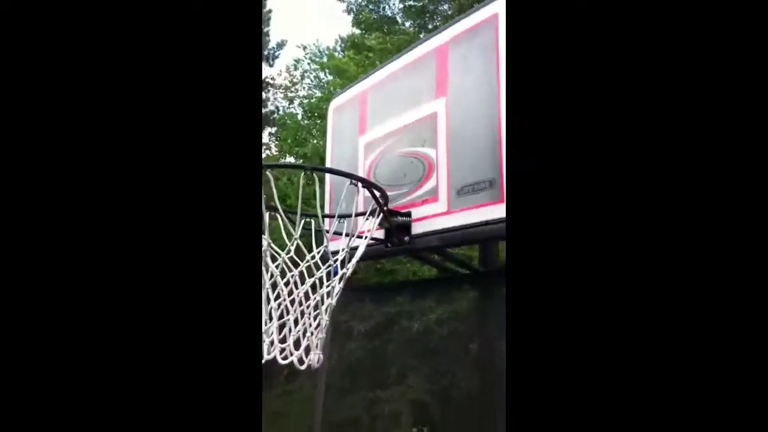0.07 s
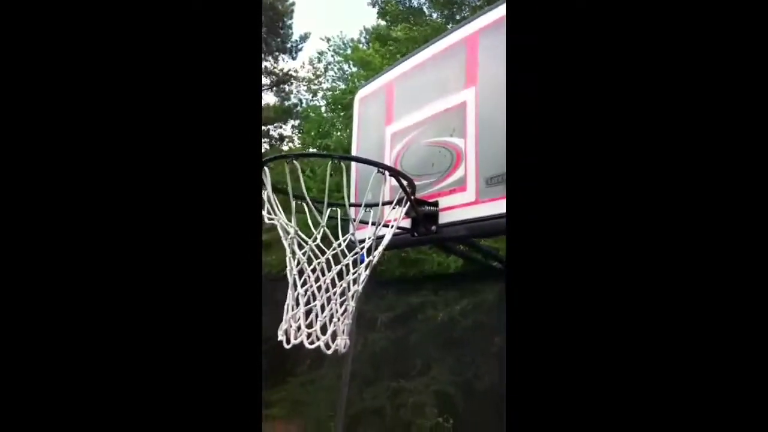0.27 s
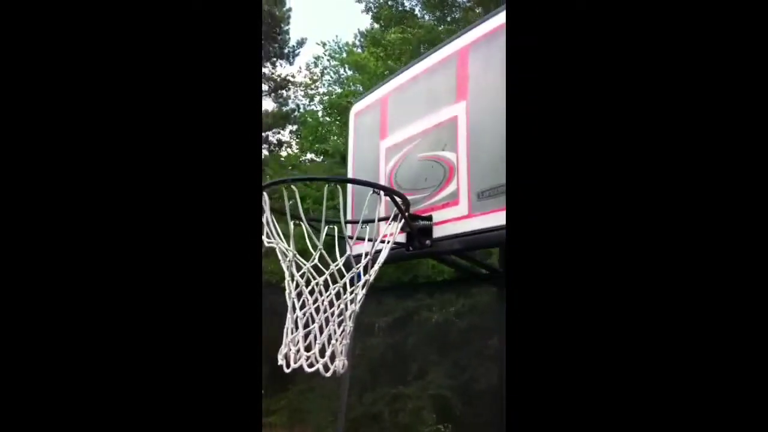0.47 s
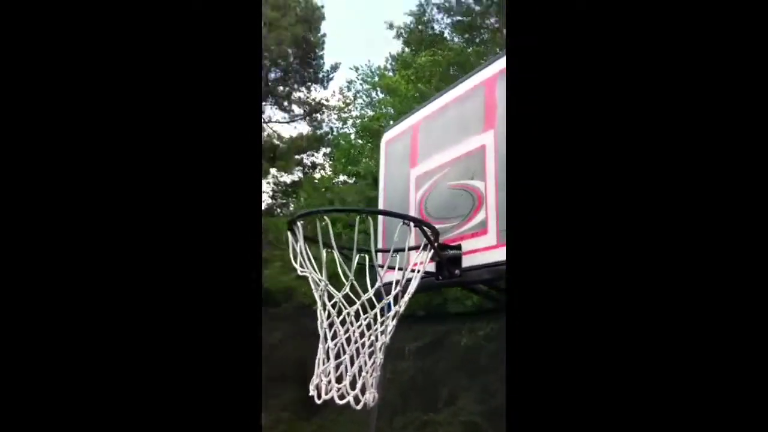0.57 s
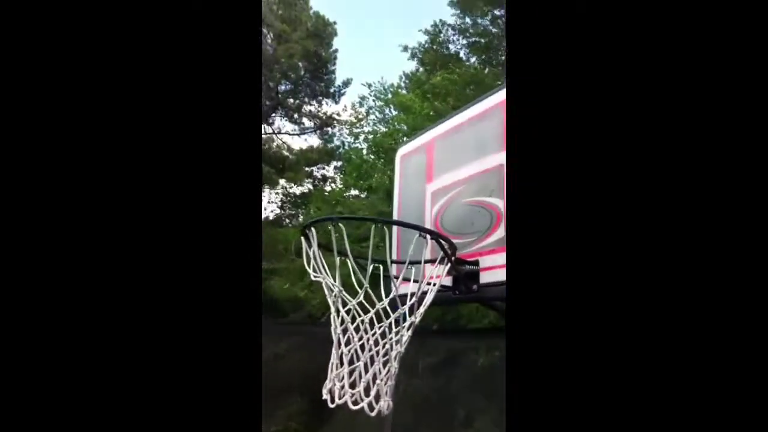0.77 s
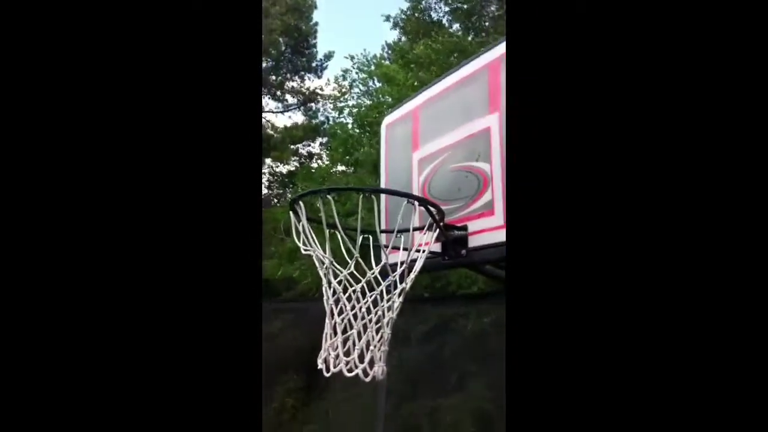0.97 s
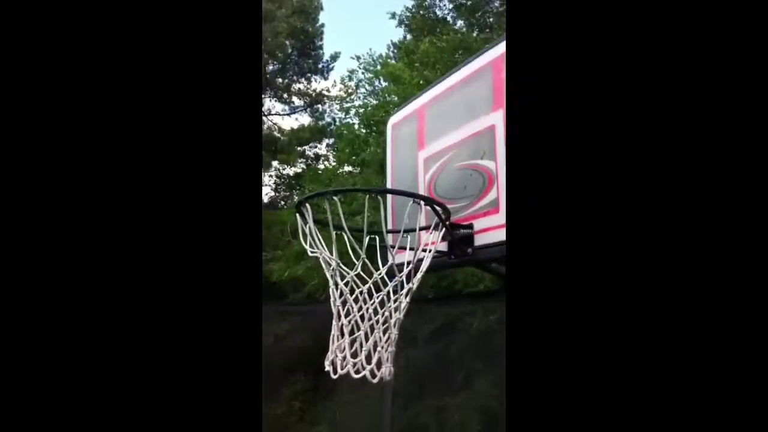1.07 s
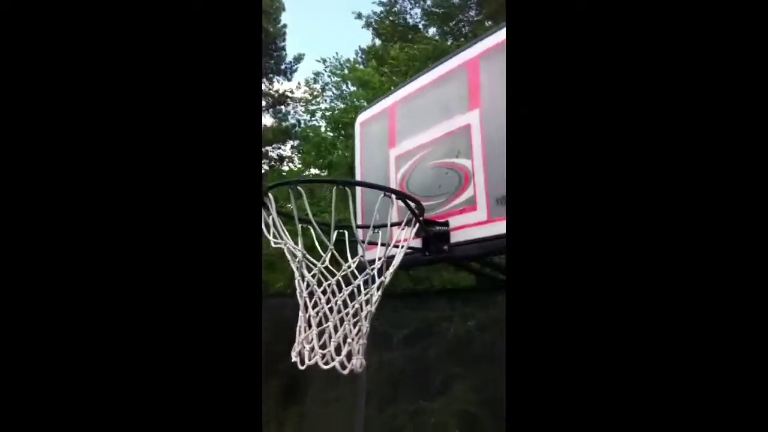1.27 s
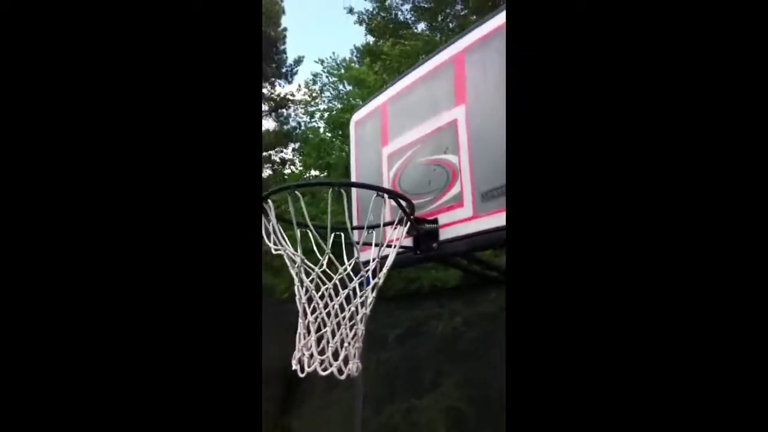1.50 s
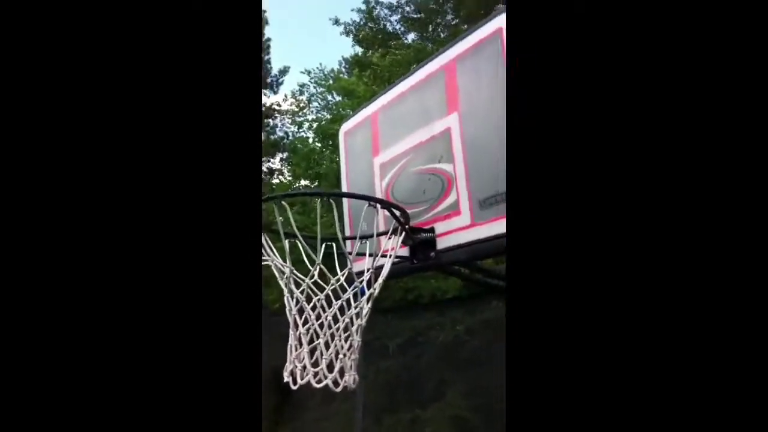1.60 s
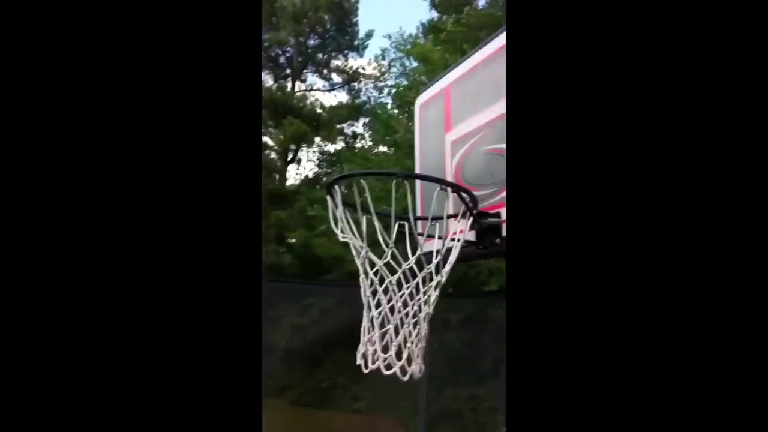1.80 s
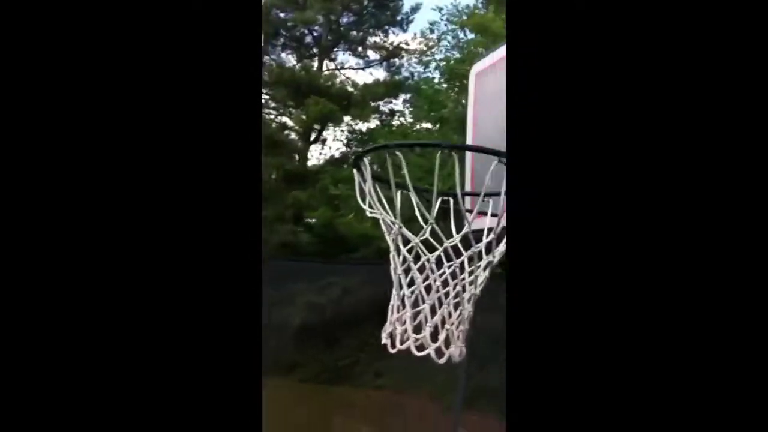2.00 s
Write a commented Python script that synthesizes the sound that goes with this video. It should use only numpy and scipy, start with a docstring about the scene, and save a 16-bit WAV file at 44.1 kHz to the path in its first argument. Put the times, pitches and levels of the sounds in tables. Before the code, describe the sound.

Rough swishing drags of feet sliding on a woven trampoline mat, close by in a quiet garden

```python
"""Feet land and slide on the woven mat of a garden trampoline, close by, outdoors.
Throughout, filtered noise makes far traffic and leaves, a wavering sine an insect's thin whine.
From the start, steel hook modes clink now and then; filtered thread slips make rushing drags.
Soon springs creak as wandering sines and landings thud as damped mat modes; late, dry knocks hit the frame pad."""
import sys
import numpy as np
from scipy import signal
from scipy.fft import rfft, irfft, next_fast_len
from scipy.io import wavfile

SR = 44100
rng = np.random.default_rng(int(sys.argv[2]) if len(sys.argv) > 2 else 0)


def wrap_up_sound(samples):
    """Save the sound to the file named by the first command line argument, as 16-bit audio."""
    columns = np.atleast_2d(samples).T
    # keep every value between -1 and 1, then stretch to whole-number steps
    tamed = np.clip(columns, -1, 1)
    steps = np.round(tamed * 32767).astype(np.int16)
    wavfile.write(sys.argv[1], SR, steps)


def boost_factor(decibels):
    """Convert a level in decibels to a linear amplitude factor."""
    exponent = np.asarray(decibels, float) / 20
    return 10 ** exponent


N = 90404


def rms_one(x):
    """Scale to rms 1."""
    return x / np.sqrt(np.mean(x ** 2) + 1e-20)


def butter(x, order, cut_hz, kind="low"):
    """Causal Butterworth filter."""
    return signal.sosfilt(signal.butter(order, cut_hz, kind, fs=SR, output="sos"), x)


def butter_zero_phase(x, order, cut_hz, kind="low"):
    """Butterworth filter run forwards and backwards, so its band can be subtracted."""
    return signal.sosfiltfilt(signal.butter(order, cut_hz, kind, fs=SR, output="sos"), x)


def colour(x, points):
    """Causal (minimum-phase) filter with the given dB over log frequency, via the folded cepstrum."""
    size = next_fast_len(len(x) + 4096) * 2
    hz, db = np.transpose(points)
    log_hz = np.log(np.fft.rfftfreq(size, 1 / SR) + 1)
    log_gain = np.interp(log_hz, np.log(hz), db) * np.log(10) / 20
    cepstrum = irfft(log_gain, size)
    cepstrum[1:size // 2] *= 2
    cepstrum[size // 2 + 1:] = 0
    return irfft(rfft(x, size) * np.exp(rfft(cepstrum)), size)[:len(x)]


def drift(corner_hz):
    """Chance wander of rms 1: noise through two equal real poles."""
    r = np.exp(-2 * np.pi * corner_hz / SR)
    noise = rng.standard_normal(N + SR)
    settled = signal.lfilter([1], [1, -2 * r, r * r], noise)[SR:]
    return rms_one(settled)


def narrow(x, hz, width_hz):
    """Two-pole resonance with gain 1 on top."""
    r = np.exp(-np.pi * width_hz / SR)
    poles = [1, -2 * r * np.cos(2 * np.pi * hz / SR), r * r]
    return signal.lfilter([(1 - r * r) / 2, 0, (r * r - 1) / 2], poles, x)


def waver(hz, waver_hz, flicker_db):
    """Sine that wanders in pitch and level, each by its own drift."""
    corner_hz = 55
    level = boost_factor(flicker_db * drift(corner_hz))
    pitch_hz = hz + waver_hz * drift(corner_hz)
    return level * np.sin(2 * np.pi * np.cumsum(pitch_hz) / SR)


def strike(times_s, levels_db, modes):
    """Clicks ring damped modes (Hz, dB, t60 s); levels_db is blows x modes."""
    out = np.zeros(N)
    for (hz, db, t60_s), blow_db in zip(modes, np.transpose(levels_db)):
        clicks = np.full(N, 1e-18)
        clicks[(np.asarray(times_s) * SR).astype(int)] = boost_factor(blow_db + db)
        r = boost_factor(-60 / (t60_s * SR))
        w = 2 * np.pi * hz / SR
        out += signal.lfilter([0, np.sin(w)], [1, -2 * r * np.cos(w), r * r], clicks)
    return out


def garden():
    """Far traffic and leaves as coloured noise, its level slightly unsteady, plus an insect's whine."""
    level_db, flicker_db, flicker_corner_hz = -55, 0.8, 3.5
    # Spectrum of the hum. Each row: frequency [Hz], relative density [dB per Hz].
    hum_spectrum = [(20, -23), (55, -25), (90, -18), (140, -6), (270, -2.5), (600, -8), (900, -6),
                    (1350, -19.5), (2100, -16.5), (2700, -19.5), (3300, -26.5), (8000, -27.5),
                    (16500, -32.5)]
    hum = rms_one(colour(rng.standard_normal(N), hum_spectrum))
    hum = hum * boost_factor(level_db + flicker_db * drift(flicker_corner_hz))
    insect = boost_factor(-68) * waver(2895, waver_hz=14, flicker_db=3)
    return hum + insect


def thread_slips():
    """Random single slips under the sole, in clumps, over smooth rubbing."""
    slips_per_s, spread_db, hiss_db = 16000, 2, -1.5
    clump_db, clump_corner_hz = 1.0, 90
    sizes = boost_factor(spread_db * np.minimum(rng.exponential(1, N), 5)) * rng.choice([-1, 1], N)
    slips = rms_one(sizes * (rng.random(N) < slips_per_s / SR))
    slips = slips + boost_factor(hiss_db) * rng.standard_normal(N)
    return slips * boost_factor(clump_db * drift(clump_corner_hz))


def thread_twangs(rub):
    """Single threads resonate to the rub, each rising and falling in level."""
    low_hz, high_hz, width_hz = 503.7, 15214, 46.6
    level_db, twang_db, twang_corner_hz = -2.5, 4.5, 10.5
    pitches_hz = np.linspace(np.sqrt(low_hz), np.sqrt(high_hz), num=70) ** 2
    pitches_hz = pitches_hz * rng.uniform(0.99, 1.01, size=70)
    twang = boost_factor(level_db + twang_db * drift(twang_corner_hz))
    # one level curve, shifted in time by chance for every thread
    return sum(np.roll(twang, rng.integers(N)) * narrow(rub, hz, width_hz) for hz in pitches_hz)


def drag():
    """Filtered thread slips ring the taut weave; level, lows and treble follow each stroke of the sole."""
    # Strokes, one table per stretch. Each row: time [s], level [dB],
    # low part and treble over or under their usual share [dB].
    strokes = [
        [(0.0, -65, 2, -7), (0.02, -76, -4, -6), (0.034, -54.5, 13, 8), (0.088, -73.5, 19, -28),
         (0.158, -46, 5, 10), (0.194, -55, 6, -6), (0.226, -29.5, 5, 7), (0.26, -23, 4.5, 7.5),
         (0.308, -23, -1.5, 5), (0.374, -42.5, 0, 7), (0.406, -29, 0, 6), (0.476, -24.5, -0.5, 5),
         (0.55, -36.5, 5, 5)],
        [(0.552, -41.5, 10, 0.5), (0.584, -33, 0.5, 4), (0.624, -47, 10.5, 6.5), (0.682, -33.5, -1.5, -2.5),
         (0.722, -51, 11, 6), (0.734, -28.5, -1.5, -2.5), (0.774, -50.5, 6, 5), (0.904, -66, 19, -4),
         (1.074, -70, 4, -2), (1.08, -59, 0.5, 6)],
        [(1.09, -71, 0.5, 0.5), (1.116, -102, 0.5, -5), (1.128, -44.5, 3, -4), (1.15, -31.5, 3, 4.5),
         (1.252, -23.5, 3.5, 4.5), (1.344, -46.5, -0.5, 6), (1.402, -37, 3, 2.5), (1.496, -31.5, 6.5, 4),
         (1.56, -46.5, 7.5, 1)],
        [(1.565, -42, -9, -6), (1.603, -43, 7.5, 10), (1.617, -47, 6, 6), (1.635, -38.5, 4.5, 6.5),
         (1.715, -65, 0.5, 4), (1.765, -55, 7.5, -4), (1.979, -76, 24, 23), (2.05, -67, 23.5, -6)],
    ]
    # Colour of the rubbing as picked up, with a narrow dip near 10 kHz.
    # Each row: frequency [Hz], relative density [dB per Hz].
    rub_spectrum = [(120, -48), (250, -14.5), (450, -19), (700, -14.5), (1170, -8), (1540, -4.5),
                    (1960, -5.5), (2340, 1.17), (3730, -0.5), (4960, 1.15), (6300, -5.5), (7000, -7.5),
                    (9600, -15.5), (10200, -19), (10800, -15.5), (11800, -13), (14200, -17), (16200, -19)]
    # Resonances of the taut weave. Each row: frequency [Hz], width [Hz], level [dB].
    weave_rings = [(739, 20, 5.5), (1470, 170, -36), (2210, 30, -14), (3330, 66, 1), (3860, 10, -55),
                   (5160, 90, -20), (5710, 41, 3), (6250, 270, -3), (7620, 49, 1.5)]
    rub = colour(thread_slips(), rub_spectrum)
    rings = sum(boost_factor(db) * narrow(rub, hz, width_hz) for hz, width_hz, db in weave_rings)
    rub = rms_one(rub + thread_twangs(rub) + rings)
    low = butter_zero_phase(rub, 2, 1400)
    treble = butter_zero_phase(rub, 2, 9000, "high")
    middle = rub - low - treble
    times_s, *columns_db = np.transpose(np.concatenate(strokes))
    t = np.arange(N) / SR
    level, low_gain, treble_gain = [boost_factor(np.interp(t, times_s, db)) for db in columns_db]
    return level * (middle + low_gain * low + treble_gain * treble)


def clinks():
    """Small steel spring hooks touch the frame; a resonant filter softens each mode's first touch."""
    # Touches. Each row: time [s], strike level [dB].
    touches = [(0.002, -55), (0.590, -53), (0.600, -43), (0.7076, -48), (0.951, -49), (0.9543, -56),
               (0.988, -68), (1.572, -48)]
    # Modes of a hook. Each row: frequency [Hz], level [dB], t60 [s].
    hook = [(13040, 3, 0.069), (15050, 2, .045), (7940, -4.5, 0.067), (12600, 4, 0.041)]
    rise_width_hz = 260
    times_s, db = np.transpose(touches)
    levels_db = db[:, None] + rng.normal(0, 1.5, (len(times_s), len(hook)))
    out = np.zeros(N)
    for k, mode in enumerate(hook):
        out += narrow(strike(times_s, levels_db[:, [k]], [mode]), mode[0], rise_width_hz)
    return out


def spring_tones():
    """Loaded springs creak: short wandering sines under half-sine swells."""
    # Creaks. Each row: start [s], length [s], pitch [Hz], pitch waver [Hz], level [dB].
    creaks = [(0.113, 0.048, 2650, 89, -51), (0.22, 0.068, 397.4, 4.7, -43.5), (0.398, 0.12, 388, 2.8, -45),
              (1.123, .022, 1280, 40, -42), (1.385, 0.025, 1750, 13, -35), (1.377, 0.035, 1475, 14, -41)]
    t = np.arange(N) / SR
    out = np.zeros(N)
    for start_s, length_s, hz, waver_hz, db in creaks:
        swell = np.sin(np.pi * np.clip((t - start_s) / length_s, 0, 1))
        out += boost_factor(db) * swell * waver(hz, waver_hz, flicker_db=1.0)
    return out


def thuds():
    """Soft foot pushes ring the heavily damped mat; the open mat sends out no deep bass."""
    # Pushes. Each row: time [s], strike level [dB], brightness (lift of the upper modes) [dB].
    pushes = [(0.1307, -40.5, -3), (0.135, -42.5, 7), (0.14, -30.5, -11), (0.299, -46.5, 11),
              (0.31, -38, 3), (0.329, -46, -27), (1.0815, -38, -0.5), (1.0865, -34.5, -5), (1.275, -43, -8)]
    # Modes of the mat. Each row: frequency [Hz], level [dB], t60 [s].
    mat = [(147, 5, 0.029), (396, 2, 0.028), (704, -7.5, 0.044), (1020, -13, 0.045)]
    contact_cut_hz, radiates_from_hz = 1500, 102
    times_s, db, bright_db = np.transpose(pushes)
    upper = np.arange(len(mat)) > 0
    levels_db = db[:, None] + bright_db[:, None] * upper
    levels_db = levels_db + rng.normal(0, 1, levels_db.shape)
    rung = butter(strike(times_s, levels_db, mat), 2, contact_cut_hz)
    return butter(rung, 4, radiates_from_hz, "high")


def knocks():
    """Light dry knocks on the frame pad: a brief damped mode through a broad resonance at its pitch."""
    # Knocks. Each row: time [s], level [dB], pitch [Hz].
    blows = [(1.8745, -35, 445), (1.919, -38.5, 347), (1.9255, -36.5, 646), (1.9325, -42, 500),
             (2.032, -50, 203)]
    ring_cycles = 3.9  # struck mode's t60, ahead of the resonance
    out = np.zeros(N)
    for time_s, db, hz in blows:
        struck = strike([time_s], [[db + 7]], [(hz, 0, ring_cycles / hz)])
        out += narrow(struck, hz, width_hz=hz)
    return out


def scatter(x):
    """Dull diffuse echo from trees and fence: convolution with decaying noise."""
    level_db, t60_s, delay_s, cut_hz = -22.5, 0.12, 0.012, 2800
    t = np.arange(SR // 2) / SR
    tail = rng.standard_normal(len(t)) * boost_factor(-60 * t / t60_s) * (t > delay_s)
    tail = butter(tail, 1, cut_hz)
    tail = tail / np.sqrt(np.sum(tail ** 2))
    return boost_factor(level_db) * signal.fftconvolve(x, tail)[:N]


def scene():
    """Near sounds, their echo and the garden; one microphone feeds both channels."""
    near = drag() + thuds() + knocks() + clinks() + spring_tones()
    return np.tile(near + scatter(near) + garden(), (2, 1))


def band_limit(x):
    """A steep low-pass at the top of the band."""
    return signal.sosfilt(signal.butter(12, 16470, fs=SR, output="sos"), x)


def record(dry):
    """A steep low-pass removes the top, 60 dB down from 16350 Hz."""
    top_cut = signal.cheby2(14, 60, 16350, fs=SR, output="sos")
    heard = signal.sosfilt(top_cut, dry)
    return band_limit(heard)


dry = scene()
out = record(dry)
wrap_up_sound(out)
```